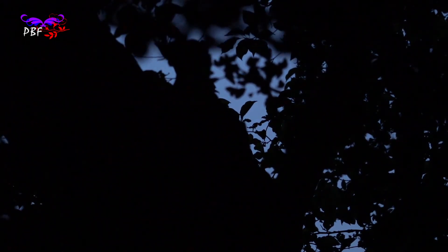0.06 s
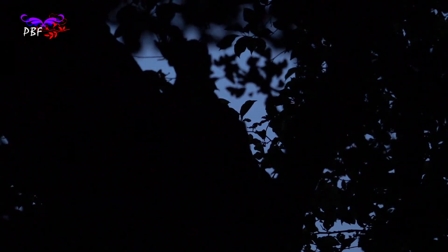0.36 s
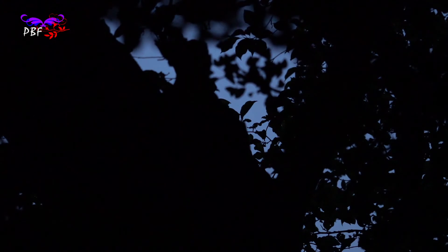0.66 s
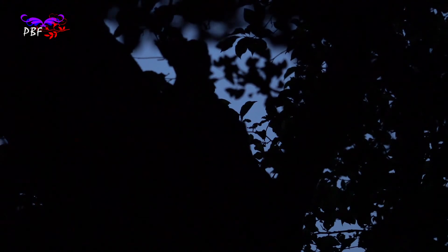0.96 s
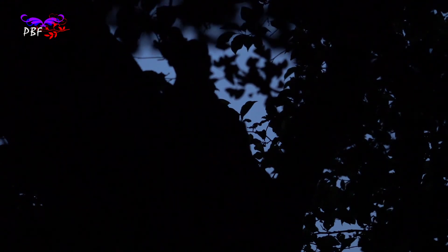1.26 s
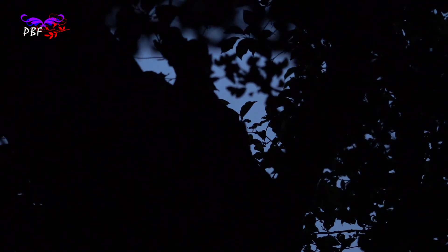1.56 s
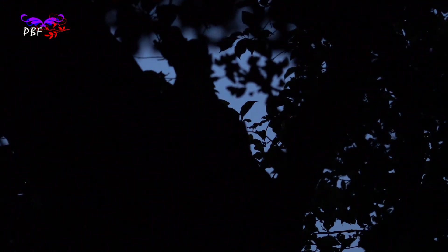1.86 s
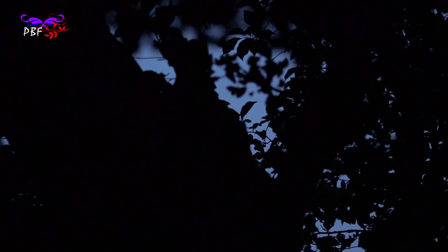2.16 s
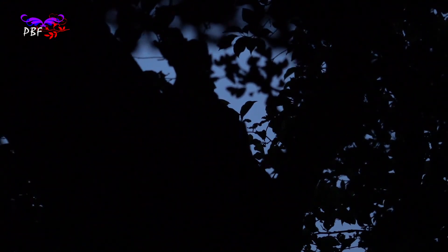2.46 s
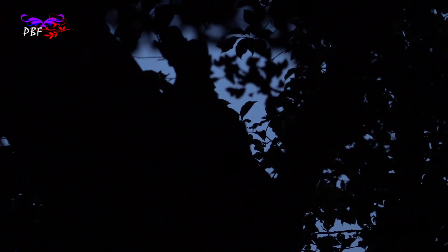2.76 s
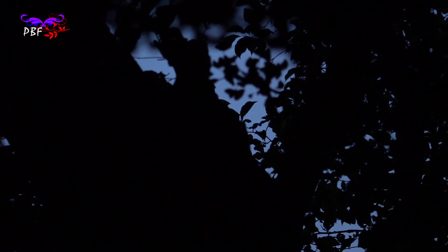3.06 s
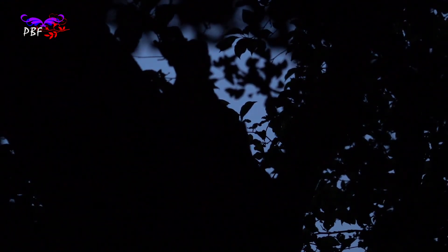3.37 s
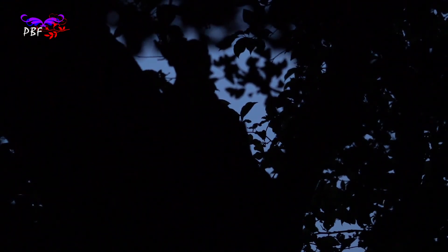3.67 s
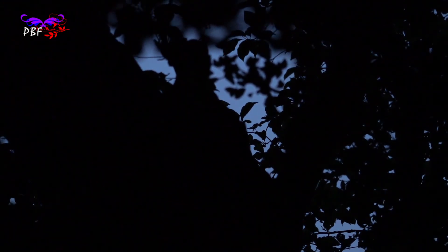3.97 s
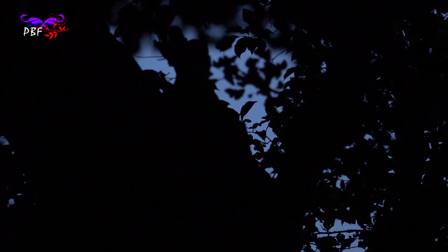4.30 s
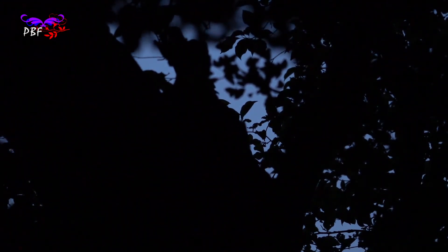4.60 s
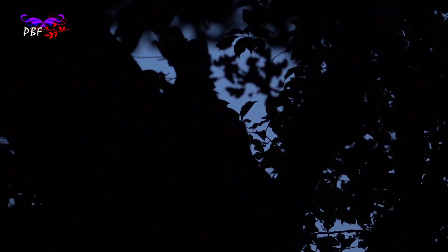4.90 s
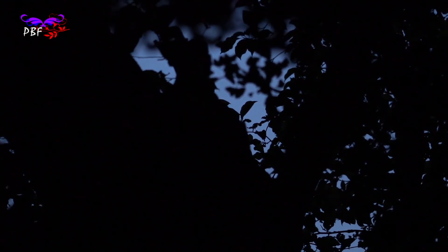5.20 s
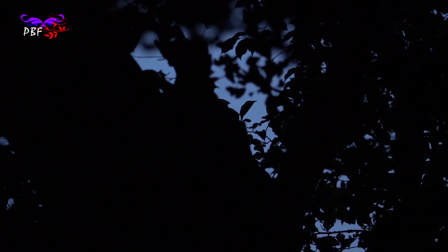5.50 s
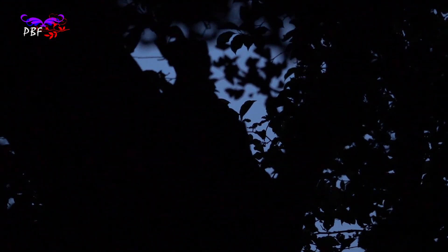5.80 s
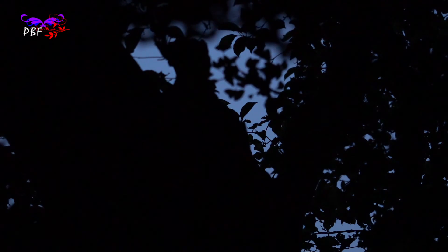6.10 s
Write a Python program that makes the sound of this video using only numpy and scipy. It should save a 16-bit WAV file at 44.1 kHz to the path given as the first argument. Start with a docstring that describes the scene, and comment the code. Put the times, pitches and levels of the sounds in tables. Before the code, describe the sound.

Insects buzz steadily outdoors while a frog rasps in quick, even bouts among small rising trills, with a few crow caws and low hoots.

```python
"""Dusk under trees

Insects ring their wing plates over a faint far rumble. A frog's chaotic larynx rasps in bouts, about
three times a second, among smaller callers' rising trills. A crow caws through its resonant throat,
far off and then nearer; there is one dry tap, and a low voice ends with four ever louder hoots.
Trunks and leaves scatter the calls into reverberation."""
import sys
import numpy as np
from scipy import signal
from scipy.fft import rfft, irfft, next_fast_len
from scipy.io import wavfile
from scipy.ndimage import map_coordinates

SR = 44100
rng = np.random.default_rng(int(sys.argv[2]) if len(sys.argv) > 2 else 0)


def wav_out(sig):
    """Save sig, one row per channel (or a flat mono array), as 16-bit PCM at SR to the path in sys.argv[1]."""
    wavfile.write(sys.argv[1], SR, np.round(np.clip(np.atleast_2d(sig).T, -1, 1) * 32767).astype(np.int16))


N = 275625


def amp(db):
    """Amplitude ratio of a level in decibels."""
    return 10 ** (np.asarray(db) / 20)


def unit(x):
    """Normalisation to rms 1."""
    return x / np.sqrt(np.mean(x ** 2) + 1e-20)


def along(points, hz):
    """Interpolation of (frequency [Hz], value) points on a logarithmic frequency axis."""
    f, v = np.transpose(points)
    return np.interp(np.log(hz + 1), np.log(f + 1), v)


def wobble(rate, size):
    """Smooth random modulation: a spline through `rate` Gaussian values a second."""
    knots = rng.standard_normal(int(size * rate / SR) + 4)
    return map_coordinates(knots, [np.arange(size) * rate / SR])


def filtered(x, response):
    """Linear filtering: the spectrum of x times a frequency response."""
    size = next_fast_len(len(x) + 8192)
    return irfft(rfft(x, size) * response(np.fft.rfftfreq(size, 1 / SR)), size)[:len(x)]


def coloured(x, spectrum):
    """Spectral shaping by (frequency [Hz], level [dB]) points, normalised to rms 1."""
    return unit(filtered(x, lambda hz: amp(along(spectrum, hz))))


def noise(spectrum, size):
    """White noise shaped by a spectral envelope, at rms 1."""
    return coloured(rng.standard_normal(size), spectrum)


def cycle(hz):
    """Phase in radians as the time integral of frequency."""
    return 2 * np.pi * np.cumsum(hz) / SR


def swell(t, length, rise, fall):
    """Envelope with a quarter-sine attack and release; times in seconds."""
    attack, release = np.clip(t / rise, 0, 1), np.clip((length - t) / fall, 0, 1)
    return np.sin(np.pi / 2 * attack) * np.sin(np.pi / 2 * release)


def arches(rows, rise_share):
    """Level contour: one excursion from zero for each (time [s], duration [s], height [dB]) row."""
    t = np.arange(N) / SR
    return sum(db * swell(t - start, length, rise_share * length, (1 - rise_share) * length)
               for start, length, db in rows)


def add(track, start_s, x):
    """Superposition of x on the track from start_s onward."""
    start = round(start_s * SR)
    x = x[max(-start, 0):max(N - start, 0)]
    track[max(start, 0):][:len(x)] += x


def among_trees(x, wet_db):
    """Reverberation: direct sound and decaying scatter from trunks and leaves, at unit total energy."""
    # decay of the wood: (frequency [Hz], reverberation time [s])
    decay_times = [(300, 0.97), (1400, 0.68), (3000, 0.55), (6000, 0.71), (14000, 0.52)]
    hz, t, spectra = signal.stft(rng.standard_normal(SR), SR, nperseg=256)
    decay = 1000. ** (-t / along(decay_times, hz)[:, None])
    tail = signal.istft(spectra * decay, SR, nperseg=256)[1]
    response = amp(wet_db) * tail / np.linalg.norm(tail)
    response[0] += 1  # direct path
    return signal.fftconvolve(x, response / np.linalg.norm(response))


def through_leaves(x, depth_db):
    """Multipath interference in foliage: narrow bands brighten and fade independently."""
    spectra = signal.stft(x, nperseg=1024)[2]
    patch = np.outer(signal.windows.hann(7), signal.windows.hann(29))  # bins by frames
    field = unit(signal.fftconvolve(rng.standard_normal(spectra.shape), patch, mode="same"))
    gain = unit(amp(depth_db * 2 * np.tanh(field / 2)))
    return signal.istft(spectra * gain, nperseg=1024)[1][:N]


def rasping_frog():
    """Chaotic vibration of the larynx broadens each partial; strain lifts the pitch and adds a screech."""
    # calls: (time [s], level [dB], duration [s], relative screech level [dB])
    rasps = [(-.19, -48, .13, -17), (.086, -49.5, 0.14, 7), (.361, -50, 0.13, -20),
             (.657, -50.5, 0.11, -21), (0.933, -52.5, .14, -13.5), (1.208, -50, .14, -6.5),
             (1.928, -50.5, 0.14, -14.5), (2.223, -49, 0.13, -14), (2.508, -49, 0.13, -8),
             (2.787, -48.5, 0.15, -11), (3.096, -50.5, .16, -16), (3.376, -50.5, .14, -8),
             (4.561, -50.5, .14, -11), (4.882, -49, .13, 2.5), (5.156, -49.5, .15, 3.5),
             (5.469, -47, 0.14, 3), (5.766, -45.5, .14, 4), (6.052, -48.5, 0.18, 5.5)]
    # partials of the larynx: (harmonic number, level [dB])
    partials = [(1, -3.5), (2, -1.5), (3, -6), (4, -0.5), (5, -28)]
    # hiss of the call: (frequency [Hz], level [dB])
    hiss_spectrum = [(1130, -65), (1350, -1), (1600, 4), (1950, -8), (2300, -3.5), (3100, -4), (3750, -29),
                     (4300, -8.5), (4850, -10), (5600, 3), (6200, -25), (7000, -6), (10000, -28)]
    # screech band: (ratio to centre frequency, level [dB])
    screech_shape = [(.38, -38), (.53, -11), (.77, -8.5), (.93, 6), (1.03, 4.5), (1.16, -4), (1.38, -21.5),
                     (2, -28), (2.8, -44)]
    out, t = np.zeros(N), np.arange(SR // 4) / SR
    for start, db, length, screech_db in rasps:
        strain = amp(screech_db)
        pitch_hz, screech_hz = 1449 + 13 * strain, 2927 + 212 * strain
        phase = cycle(pitch_hz * (1 + 0.0252 * wobble(655, len(t)) + 0.01404 * wobble(120.2, len(t))))
        voice = np.zeros(len(t))
        for k, level in partials:
            # upper partials build more slowly with the pressure, and hold on longer
            envelope = swell(t, length + 0.015 * (k - 1), 0.032 + 0.012 * k, 0.12)
            voice += amp(level) * np.sin(k * phase + 0.89 * wobble(399, len(t))) * envelope
        hiss = amp(-2.5) * noise(hiss_spectrum, len(t)) * swell(t, length, 0.046, 0.089)
        screech_spectrum = [(ratio * screech_hz, level) for ratio, level in screech_shape]
        screech = strain * noise(screech_spectrum, len(t)) * swell(t, length, 0.042, 0.066)
        call = (voice + hiss + screech) * amp(0.51 * wobble(227, len(t)))
        add(out, start, among_trees(amp(db) * call, wet_db=-4))
    return through_leaves(out, depth_db=4)


def trills():
    """Randomly modulated tones with a faint subharmonic glide exponentially up toward one pitch."""
    # notes of the small callers: (time [s], duration [s], starting pitch [Hz], level [dB])
    notes = [(-.04, 0.09, 2795, -46), (0.324, 0.16, 2720, -53), (0.549, 0.19, 3270, -61),
             (0.707, 0.12, 2735, -50.5), (1.127, 0.099, 3260, -57.5), (1.146, 0.15, 2740, -53),
             (1.569, 0.15, 2770, -54), (1.8, 0.31, 3204, -66.5), (2.076, 0.15, 2788, -51),
             (2.185, 0.12, 3270, -61), (2.401, .11, 3210, -61.5), (2.722, 0.2, 2716, -58),
             (3.165, 0.23, 3230, -60.5), (3.443, 0.18, 2704, -51), (3.572, .1, 2360, -58),
             (3.797, .18, 3266, -59), (3.852, 0.18, 2688, -51.5), (4.126, 0.17, 2920, -51),
             (4.305, 0.18, 3210, -54.5), (4.347, 0.16, 2712, -50), (4.781, 0.26, 2754, -52),
             (5.011, .11, 3290, -60), (5.252, .12, 3046, -46), (5.932, .22, 2660, -51.5)]
    ceiling_hz, glide_s = 3484, 0.4
    out, t = np.zeros(N), np.arange(SR // 3) / SR
    for start, length, start_hz, db in notes:
        pitch_hz = ceiling_hz + (start_hz - ceiling_hz) * np.exp(-t / glide_s)
        phase = cycle(pitch_hz * (1 + 0.0264 * wobble(900, len(t)) + 0.0185 * wobble(70.5, len(t))))
        tone = np.sin(phase) + amp(-18.5) * np.sin(phase / 2 + wobble(500, len(t)))
        flutter = amp(1.2 * wobble(163.3, len(t)) + 2.2 * wobble(900, len(t)))
        call = unit(tone * flutter) * swell(t, length, 0.043, 0.086)
        add(out, start, among_trees(amp(db) * call, wet_db=2.5))
    return out


def scrapes(stroke_hz, regular_share, count):
    """Stridulation: a few insects each repeat one scrape at their own rate; the rest blur into noise."""
    crowd = np.zeros(N)
    for _ in range(count):
        rate_hz = stroke_hz * (1 + 0.04 * rng.standard_normal()) * (1 + 0.0005 * wobble(5, N))
        strokes = np.diff(np.floor(np.cumsum(rate_hz) / SR), prepend=0)
        effort = amp(2.5 * wobble(3, N))
        crowd += effort * signal.oaconvolve(strokes, rng.standard_normal(SR // 70))[:N]
    return np.sqrt(regular_share) * unit(crowd) + np.sqrt(1 - regular_share) * rng.standard_normal(N)


def insects():
    """Resonance: bursts of tooth strikes ring the wing plates; a farther crowd shimmers above."""
    # slow drift: (time [s], low buzz level [dB], high buzz level [dB], shimmer level [dB])
    drift = [(0, -46.5, -43.5, -49), (.6, -52, -45, -47.5), (1.15, -52, -47, -50), (1.9, -49.5, -47, -50),
             (2.15, -44.5, -47, -51.5), (2.6, -50.5, -47, -50.5), (3.1, -49.5, -48, -48.5),
             (4.25, -49.5, -46, -50.5), (4.9, -50, -46.5, -49), (5.7, -48.5, -51, -52.5),
             (6.25, -48, -53.5, -52)]
    # the near insects falter: (time [s], duration [s], depth [dB])
    lulls = [(.72, 0.13, 2), (1.37, .07, 3), (2.7, 0.16, 3), (3.48, 0.41, 7), (4.79, 0.17, 7),
             (4.96, .24, 9)]
    # wing plate modes: (frequency [Hz], bandwidth [Hz], level [dB])
    modes = [(6692, 32, 0.5), (6910, 19, -0.5), (7092, 52, 3), (7300, 170, -2.5), (7440, 38, -6),
             (7625, 105, -1)]
    # spectra of the buzz, the far crowd and the buzz's overtone: (frequency [Hz], level [dB])
    buzz_spectrum = [(5500, -54), (6250, -1.5), (6700, -0.5), (7800, 3), (8300, -13), (11000, -15),
                     (13000, -23)]
    shimmer_spectrum = [(5800, -45), (7000, -19.5), (8100, 3.5), (9100, -1.5), (9800, 4), (10500, -2.5),
                        (11300, -10.5), (12500, -11.5), (13300, -26), (16000, -32)]
    overtone_spectrum = [(11000, -18.5), (13500, -22), (13800, -2), (14100, -6), (14900, 1), (15400, -13),
                         (15800, -15)]
    stroke_hz, plate_split_hz = 71.1, 7106

    def plates(hz):
        """Lorentzian resonances add in power under the buzz's spectral envelope."""
        power = sum(amp(2 * db) / (1 + (2 * (hz - centre) / width) ** 2) for centre, width, db in modes)
        return amp(along(buzz_spectrum, hz)) * np.sqrt(power)

    times, *levels = np.transpose(drift)
    low_db, high_db, shimmer_db = [np.interp(np.arange(N) / SR, times, db) for db in levels]
    effort_db = 0.9 * wobble(14, N) - arches(lulls, rise_share=0.38)
    throb = 1 + 0.16 * np.cos(cycle(stroke_hz * (1 + 0.0036 * wobble(3.56, N))))
    ring = filtered(scrapes(stroke_hz, regular_share=0.21, count=4), plates)
    low = filtered(ring, lambda hz: hz < plate_split_hz)
    buzz = (amp(low_db) * unit(low) + amp(high_db) * unit(ring - low)) * amp(effort_db) * throb
    shimmer = coloured(scrapes(stroke_hz, regular_share=0.39, count=3), shimmer_spectrum)
    overtone = coloured(scrapes(stroke_hz, regular_share=0.39, count=2), overtone_spectrum)
    treble = amp(shimmer_db) * shimmer + amp(-61.5 + 0.75 * effort_db) * overtone
    # the shortest waves are scattered most
    return through_leaves(treble, depth_db=5.2) + through_leaves(buzz, depth_db=2)


def evening_air():
    """Ambient noise: a far rumble modulated in the bass, a faint hiss and dull band-limited bumps."""
    # swells of the rumble: (time [s], duration [s], lift [dB])
    swells = [(.02, 0.25, 9), (1.22, 0.36, 7.5), (1.92, 0.38, 7), (2.38, 0.16, 7.5), (2.65, 0.21, 11),
              (3.52, 0.22, 4.5), (4.15, 0.5, 8), (5.85, 0.45, 1)]
    # spectra of the rumble and the hiss: (frequency [Hz], level [dB])
    rumble_spectrum = [(20, -13), (40, -4.5), (60, 2), (80, -0.5), (101, 3.5), (130, -4.5), (170, -9.5),
                       (280, -12), (450, -17.5), (650, -21.5), (820, -18.5), (1000, -21.5), (1400, -26),
                       (2000, -27.5), (3000, -56)]
    hiss_spectrum = [(1200, -27), (2300, -7), (3200, 14), (3900, -8), (6000, 1), (15000, -0.5)]
    # distant bumps: (time [s], duration [s], centre frequency [Hz], level [dB])
    bumps = [(1.831, 0.21, 200, -59.5), (2.854, 0.14, 423, -64.5), (2.985, 0.13, 296, -68),
             (3.66, 0.17, 210, -62.5)]
    bass_db = -60.5 + arches(swells, rise_share=0.48) + wobble(10, N)
    rumble = through_leaves(noise(rumble_spectrum, N), depth_db=3)
    bass = filtered(rumble, lambda hz: 1 / (1 + (hz / 160) ** 6))
    out = amp(bass_db) * bass + amp(-57.5) * (rumble - bass) + amp(-67.5) * noise(hiss_spectrum, N)
    t = np.arange(SR // 4) / SR
    for start, length, hz, db in bumps:
        bump = noise([(hz / 2, -30), (hz, 0), (hz * 1.7, -30)], len(t))
        add(out, start, amp(db) * bump * swell(t, length, 0.023, 0.068))
    return out


def crow():
    """Source and filter: a sagging harmonic voice excites the throat; distance leaves only its midrange."""
    # calls: (time [s], duration [s], pitch [Hz], sag [Hz], level [dB], roughness [0-1], nearness [0-1])
    caws = [(0.881, 0.14, 355.5, 4, -64.5, 0.17, 0), (2.955, 0.15, 411.2, 21.2, -41.5, 0, 0.27),
            (3.07, 0.12, 411.5, 10, -43.5, 0.58, .45), (3.18, 0.214, 408, 7.9, -55.5, 0.59, 0),
            (5.458, .25, 462.2, 98, -32, 0.1, 0.91)]
    # throat response heard near and far: (frequency [Hz], level [dB])
    near_throat = [(140, -48), (280, -6.5), (450, -17.5), (650, -18), (860, -12.5), (1060, -12),
                   (1260, -3.5), (1400, 5.5), (1780, 2), (2050, -7.5), (2450, -19), (3100, -11),
                   (5300, -11), (7000, -7.5), (10000, -43)]
    far_throat = [(400, -41), (800, -68), (980, -1.5), (1200, 19), (1600, -13), (2100, -36), (4000, -58)]
    out, t = np.zeros(N), np.arange(SR // 3) / SR
    for start, length, start_hz, sag_hz, db, roughness, near in caws:
        push = swell(t, length, rise=0.11, fall=0.072)
        rough = np.clip(roughness + 0.63 * (1 - push), 0, 1)  # hoarser as the voice opens and closes
        throat = lambda hz: amp(near * along(near_throat, hz) + (1 - near) * along(far_throat, hz))
        pitch_hz = start_hz - sag_hz * np.minimum(t / length, 1) ** 2
        phase = cycle(pitch_hz * (1 + 0.054 * rough * wobble(343.3, len(t))))
        voice = np.zeros(len(t))
        for k in range(1, 21):
            # the higher a harmonic, the more turbulence smears it
            smear = rng.uniform(0, 2 * np.pi) + 0.09 * k * wobble(250, len(t))
            voice += throat(k * pitch_hz) * np.sin(k * phase + smear)
        rasp = filtered(rng.standard_normal(len(t)), throat) * (1 + 0.27 * np.cos(phase))
        call = np.sqrt(1 - rough) * unit(voice) + np.sqrt(rough) * unit(rasp)
        add(out, start, among_trees(amp(db) * push * call, wet_db=2.5))
    return out


def leaf_tap():
    """A damped transient: one tiny dry tap on a leaf close by."""
    # tap: (time [s], peak level [dB])
    taps = [(1.426, -28.3)]
    # response of the leaf: (frequency [Hz], level [dB])
    leaf_spectrum = [(3500, -41), (4700, -10), (7000, 10), (8500, 0), (12000, -20)]
    t60_s = 0.009
    out, t = np.zeros(N), np.arange(SR // 50) / SR
    for start, db in taps:
        tap = noise(leaf_spectrum, len(t)) * swell(t, 0.02, 0.0012, 0.005) * amp(-60 * t / t60_s)
        add(out, start, amp(db) * tap / np.abs(tap).max())
    return out


def hoots():
    """A dominant fundamental makes each arched note hollow; band noise gives it a husky edge."""
    # notes of the low voice: (time [s], duration [s], top pitch [Hz], level [dB])
    notes = [(5.691, 0.052, 352, -47.5), (5.819, 0.093, 361.8, -45.5), (5.978, 0.103, 378.5, -43.5),
             (6.132, .094, 400.7, -36.5)]
    # partials of the voice: (harmonic number, level [dB])
    partials = [(1, -1), (2, -26)]
    # husky noise: (frequency [Hz], level [dB])
    husk_spectrum = [(180, -43), (290, -9), (460, 5.5), (540, -11), (650, -17), (800, -14), (1000, -30)]
    out, t = np.zeros(N), np.arange(SR // 6) / SR
    for start, length, top_hz, db in notes:
        arch = np.sin(np.pi * np.clip(t / length, 0, 1)) - 1
        phase = cycle(top_hz * (1 + 0.137 * arch + 0.024 * wobble(150, len(t))))
        tone = sum(amp(level) * np.sin(k * phase) for k, level in partials)
        flutter = amp(3 * wobble(174, len(t)))
        husk = amp(-11) * noise(husk_spectrum, len(t))
        call = (unit(tone * flutter) + husk) * swell(t, length, 0.045, 0.035)
        add(out, start, among_trees(amp(db) * call, wet_db=-6.5))
    return out


def scene():
    """Superposition at one microphone: both channels carry the same sum."""
    mono = rasping_frog() + trills() + insects() + evening_air() + crow() + leaf_tap() + hoots()
    return np.array([mono, mono])


def record(dry):
    """Band limiting: an ideal low-pass filter removes the highest treble."""
    cutoff_hz = 15800
    return np.array([filtered(channel, lambda hz: hz < cutoff_hz) for channel in dry])


dry = scene()
out = record(dry)
wav_out(out)
```